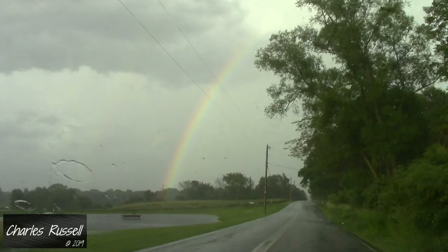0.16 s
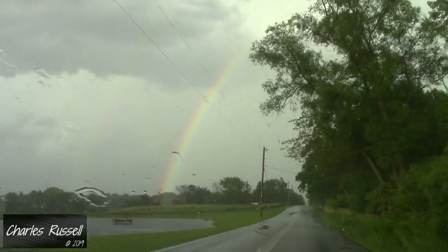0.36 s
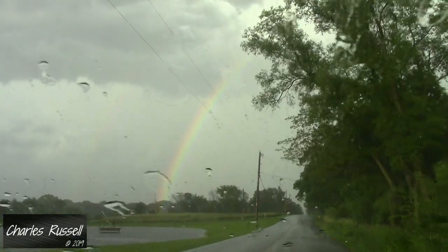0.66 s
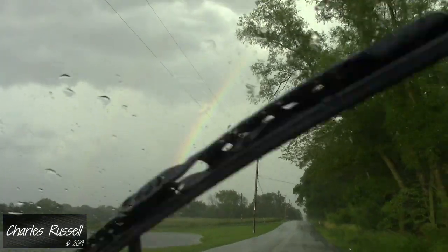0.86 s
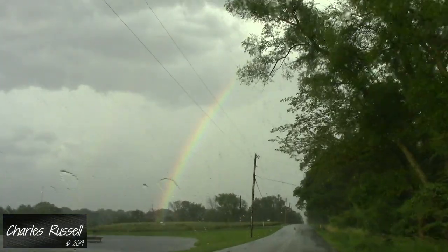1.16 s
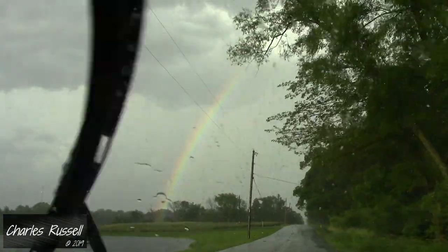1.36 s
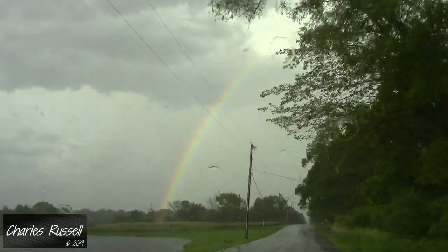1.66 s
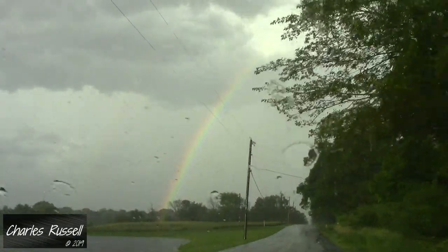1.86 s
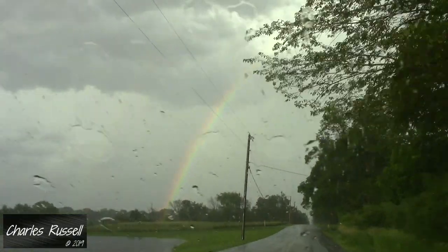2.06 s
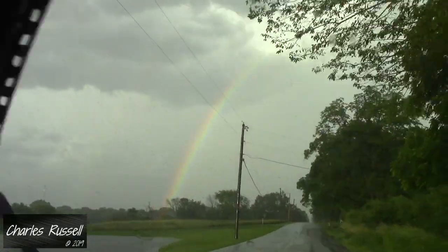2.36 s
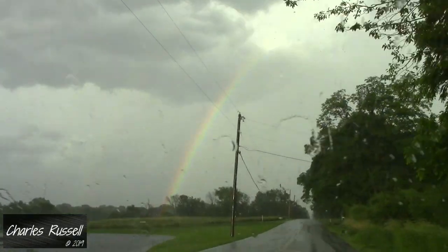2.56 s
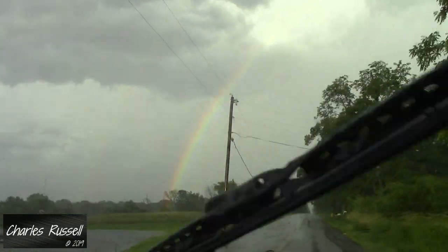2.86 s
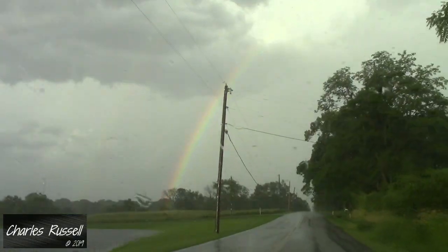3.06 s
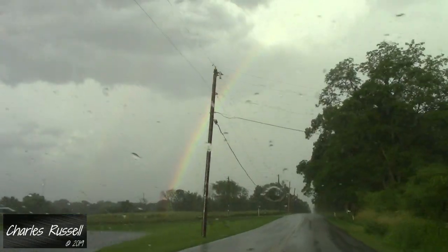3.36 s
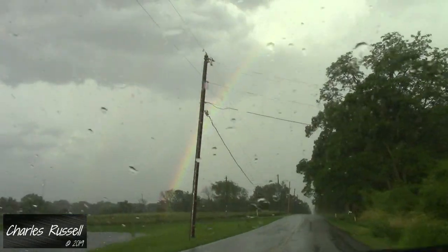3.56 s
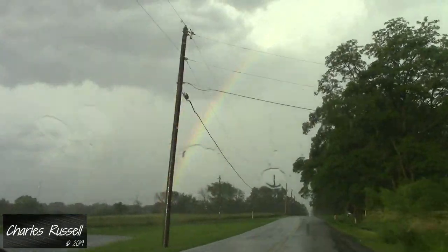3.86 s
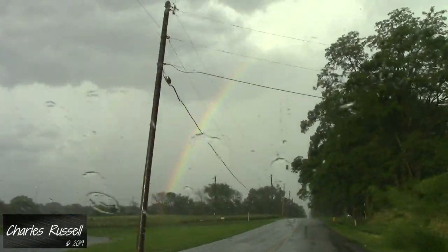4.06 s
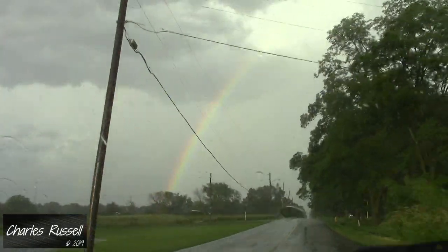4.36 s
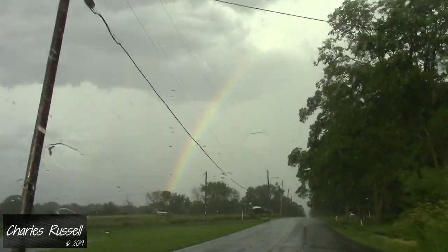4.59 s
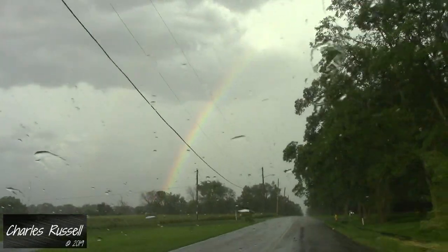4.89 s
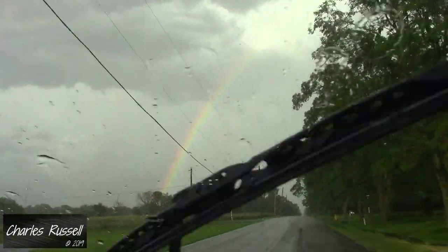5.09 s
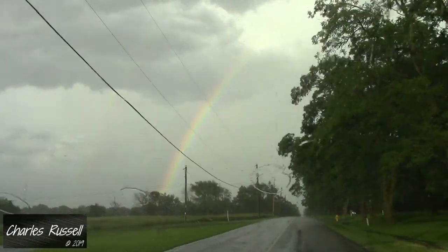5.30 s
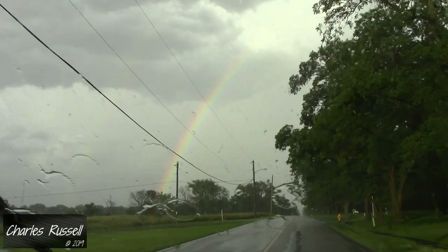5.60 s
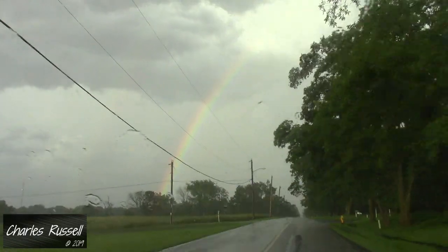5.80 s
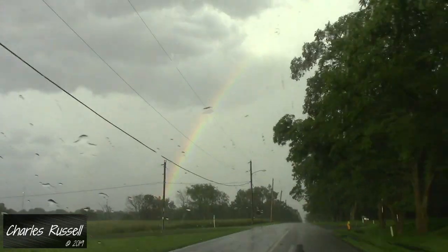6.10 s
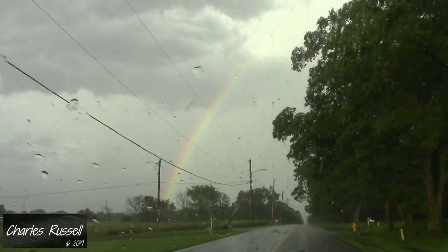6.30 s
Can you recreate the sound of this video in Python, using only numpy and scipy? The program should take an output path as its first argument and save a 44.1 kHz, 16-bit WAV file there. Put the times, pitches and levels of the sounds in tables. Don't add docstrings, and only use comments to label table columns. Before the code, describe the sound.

Heard close up inside a car moving slowly on a wet country road: low, boomy tyre and motor rumble, fine rain patter, and irregular hard ticks and hollow knocks from large drops and small hail. Wipers thump and clack about every 1.4 seconds, heavily at first, softer later. A few bumps jolt the cabin. The space is small, dry and nearly mono.

```python
import sys
import numpy as np
from scipy import signal
from scipy.io import wavfile
from scipy.ndimage import uniform_filter1d

SR = 44100
rng = np.random.default_rng(int(sys.argv[2]) if len(sys.argv) > 2 else 0)


def to_wav(sig):
    pcm = np.clip(np.atleast_2d(sig), -1, 1) * 32767
    pcm = np.round(pcm).astype(np.int16)
    wavfile.write(sys.argv[1], SR, pcm.T)


def invert_db(level):
    return 10 ** (np.asarray(level, dtype=float) / 20)


N = 284004

# [t/s, boom level/dB, f/Hz, suspension jolt 0-1]
ROAD_BUMPS = [(.51, -14, 131, .35), (1.275, 1, 128.6, .95), (1.329, -3, 132, .5), (1.454, -7, 118, 0.6),
              (1.49, 0, 145.5, .95), (1.69, -5, 145, .1), (1.79, -12, 130, 0.2), (1.86, -7, 134, .1),
              (2.001, -5, 130, .05), (3.439, -8, 143, 0), (3.781, -3, 137, 0.4), (4.015, -4.5, 125, 0.5),
              (4.085, -6, 141, .7), (5.8, -7, 141, .1), (5.835, -5, 146, .1), (5.874, -2, 129.7, 0.1),
              (6.05, -3, 150, 0.4)]
# [t/s, level/dB]
SHOWER_LEVEL = [(0.0, -27), (0.25, -28), (1.25, -29), (1.5, -28), (1.75, -28.5), (2.0, -28), (2.3, -35),
                (2.6, -29), (2.88, -37), (3.05, -35.5), (3.4, -31.5), (3.8, -33), (4.2, -28), (4.9, -33),
                (5.15, -29.5), (5.45, -32), (6.3, -29), (6.44, -30)]
# [t/s, thump/dB, clack/dB, blade knock on glass/dB]
WIPER_TURNS = [
    (.356, -1.5, -4.5, -6.5),
    (1.785, -4.5, -4, -9),
    (3.213, -9, -12.5, -18),
    (4.635, -12.5, -8, -16),
    (6.057, -14, -7.5, -14),
]
FLIP_S = 0.0125


def evened(x):
    return x / np.sqrt(np.mean(x ** 2) + 1e-20)


def read(points, hz):
    f, value = np.transpose(points)
    return np.interp(np.log(hz + 1), np.log(f + 1), value)


def colour(x, points):
    hz = np.abs(np.fft.fftfreq(8192, 1 / SR))
    log_gain = np.log(invert_db(np.maximum(read(points, hz), -100)))
    response = np.exp(np.conj(signal.hilbert(log_gain)))
    taps = np.fft.ifft(response).real[:4096]
    return signal.oaconvolve(x, taps)[:len(x)]


def add(mix, s, sound):
    part = mix[round(s * SR):][:len(sound)]
    part += sound[:len(part)]


def control(table, axis):
    rows = np.array(table)
    return np.interp(np.arange(N) / SR, rows[:, 0], rows[:, axis])


def rings(t, hz, db, t60, phase):
    decay = invert_db(db - 60 * t[:, None] / t60)
    return (decay * np.sin(2 * np.pi * (hz * t[:, None] + phase))).sum(1)


def bursts(strikes, rise_s, t60_s):
    t = np.arange(2000) / SR
    puff = np.minimum(t / rise_s, 1) * invert_db(-60 * t / t60_s)
    power = signal.oaconvolve(strikes ** 2, puff ** 2)[:N]
    return np.sqrt(abs(power)) * rng.standard_normal(N)


def road(lump_db=1.44, steady=0.3):
    # [f/Hz, level/dB]
    boom_spectrum = [(35, -20), (60, -29), (81, -16), (138, 4.5), (296, -10.5), (320, -13.5), (420, -13),
                     (700, -120)]
    drone_spectrum = [(120, -40.5), (200, -2), (278, -6), (344, 0), (417, -6), (667, -12.5), (738, -10),
                      (912, -20), (1020, -21), (1370, -27.5), (1800, -27), (2340, -34), (3960, -120)]
    heave_spectrum = [(15, -32), (30, -37), (55, 28), (80, 11), (120, -47)]
    # [t/s, level/dB]
    roughness = [(0.0, 1), (0.3, 2.5), (0.42, 3), (0.54, 3), (1.42, 2), (1.58, 6), (1.72, 6), (2.04, 5),
                 (2.12, -2.5), (3.4, 2), (3.74, -2.5), (3.98, 4.5), (4.05, 5.5), (4.44, 9.5), (4.57, -1.5),
                 (5.74, -2.5), (5.85, -0.5), (6.44, -1)]
    # [smooth-road level/dB, slope/(dB per dB of roughness), bump lift/dB]
    follow_road = [
        (-18.5, 0.86, 3),
        (-20, 0.56, 1.1),
        (-47.5, 1.5, 18),
    ]
    lag_s, rise_s, fall_s = 0.033, 0.02, 0.048

    out, t, jolt = np.zeros(N), np.arange(N) / SR, np.zeros(N)
    for s, _, _, size in ROAD_BUMPS:
        since = t - (s + lag_s)
        jolt += abs(size) * np.exp(-np.where(since < 0, -since / rise_s, since / fall_s))
    lumps = uniform_filter1d(rng.standard_normal(N), size=3000)
    lumps = evened(uniform_filter1d(lumps, size=3000))
    drive_db = control(roughness, axis=1) + lump_db * lumps
    spectra = [boom_spectrum, drone_spectrum, heave_spectrum]
    for spectrum, (level_db, slope, lift_db) in zip(spectra, follow_road):
        shake = colour(rng.standard_normal(N), spectrum)
        shake /= uniform_filter1d(shake ** 2, size=4000) ** steady + 1e-9
        out += invert_db(level_db + slope * drive_db + lift_db * np.sqrt(jolt)) * evened(shake)
    return out


def patter(per_s=650, spread_db=4.5, hiss_db=-9):
    # [f/Hz, level/dB]
    patter_spectrum = [(530, -33.5), (900, -3.5), (1030, -0.5), (1530, -6.5), (3000, -3.5), (3550, -6),
                       (4410, -12), (7580, -19.5), (10800, -29), (13400, -36), (16000, -47)]
    draw, size = rng.random(N), rng.exponential(1, N)
    strikes = invert_db(spread_db * np.minimum(size, 3.0)) * (draw < per_s / SR)
    spray = invert_db(hiss_db) * rng.standard_normal(N)
    fizz = evened(bursts(strikes, 0.0003, 0.008)) + spray
    return invert_db(control(SHOWER_LEVEL, axis=1) + 1.5) * evened(colour(fizz, patter_spectrum))


def thuds(thud_db=-5, bump_db=-4):
    # [t/s, level/dB, f/Hz]
    heavy_drops = [(0.491, -7, 328), (0.691, -10.5, 430), (0.939, -8, 261), (1.035, -1.5, 328),
                   (1.609, -2, 419), (1.644, -8, 360), (2.528, -10, 313), (2.579, -7, 340),
                   (3.235, -3, 243), (3.327, -2.5, 403), (3.859, -17, 374), (4.197, -6, 258),
                   (4.27, 0, 280), (4.4, -3.5, 334), (5.232, -6, 337), (5.842, -18, 337),
                   (6.38, -10.5, 264)]
    out, t = np.zeros(N), np.arange(12000) / SR
    for rows, trim_db, octaves, cycles in [(heavy_drops, thud_db, 0.9, 26), (ROAD_BUMPS, bump_db, 0.3, 30)]:
        for (s, db, hz, *_), c in zip(rows, rng.random((len(rows), 2, 6))):
            modes_hz = hz * 2 ** (octaves * (c[0] - 0.5))
            drum = rings(t, modes_hz, 0, cycles / hz, 0.42 * c[1])
            drum *= np.minimum(t * hz / 1.42, 1)
            add(out, s, invert_db(db + trim_db) * drum / abs(drum).max())
    return out


def wiper():
    # [f/Hz, level/dB, t60/s, delay after arm stop/FLIP_S (0: struck by the arm, above 0: by the blade)]
    wiper_modes = [
        (232, 1, 0.16, 0),
        (346, 3.5, 0.1, 0),
        (470, -1, 0.086, 0),
        (1180, -3, 0.04, 0.86),
        (1730, -5, 0.045, 1),
        (221, -4, 0.14, 1),
    ]
    out, t = np.zeros(N), np.arange(6000) / SR
    for s, thump_db, clack_db, _ in WIPER_TURNS:
        for hz, db, t60_s, blade in wiper_modes:
            near = rng.random((2, 4))
            modes_hz = hz * (0.962 + 0.085 * near[0])
            ring = rings(t, modes_hz, 0, t60_s, 0.3 * near[1])
            ring *= np.minimum(t * hz / 1.13, 1)
            hit_db = clack_db if blade else thump_db
            add(out, s + blade * FLIP_S, invert_db(hit_db + db - 3) * ring / abs(ring).max())
    return out


def strikes_all(count=130):
    # [t/s, knock/dB, panel ring centre f/Hz]
    roof_drops = [(0.0416, -20, 3800), (0.084, -14, 2440), (0.146, -15.5, 2410), (0.416, -14.5, 2560),
                  (0.626, -13.5, 2690), (0.8202, -14, 2260), (0.8622, -13, 2660), (1.1327, -17.5, 2180),
                  (1.422, -14, 2340), (1.653, -15, 2860), (2.6949, -16, 3080), (2.1372, -17.5, 3190),
                  (2.221, -16.5, 2540), (2.4982, -17, 2700), (2.562, -18, 2670), (2.6574, -9.5, 2200),
                  (2.8234, -17, 2130), (3.0773, -13.5, 2550), (3.18, -11.5, 2180), (3.029, -17, 3100),
                  (4.1216, -16, 1980), (4.2403, -18, 2630), (4.2803, -11.5, 2170), (4.3005, -15.5, 2000),
                  (4.4667, -17, 2800), (5.0382, -20, 2700), (5.2967, -16.5, 2640), (5.648, -16.5, 3070),
                  (5.738, -18, 2990), (5.981, -17, 2200)]
    # [t/s, splash/dB]
    glass_drops = [(0.044, -11.5), (.1666, -16.5), (0.6023, -21.5), (.741, -24), (1.228, -18), (1.282, -18),
                   (1.3386, -20.5), (1.7022, -20), (1.8142, -19.5), (1.917, -20.5), (1.9692, -26),
                   (2.4589, -23), (2.5399, -20.5), (2.798, -23), (3.1713, -20.5), (3.3031, -19.5),
                   (3.6035, -21.5), (3.7013, -24), (3.9857, -29), (4.2476, -22), (4.3083, -20),
                   (4.458, -19), (4.471, -20), (4.676, -22.5), (4.7432, -22.5), (5.0153, -20.5),
                   (5.738, -23), (6.043, -20.5), (6.1889, -16), (6.2978, -22)]
    # [t/s, knock/dB, ring centre f/Hz, splash/dB]
    hailstones = [(.1098, -17, 2600, -16.5), (.3115, -17.5, 2590, -23), (.3742, -28, 2600, -20),
                  (.6576, -22, 2820, -15), (.7113, -13, 2700, -13), (.7654, -15, 3050, -20),
                  (.7943, -14, 2350, -19), (.9034, -18, 2540, -18.5), (.9488, -11, 2630, -20),
                  (.9844, -6.5, 2390, -14), (1.012, -18, 2770, -18), (1.535, -12.5, 2750, -22),
                  (2.0266, -8.5, 2510, -18.5), (2.086, -15.5, 2930, -12), (2.5344, -12.5, 2750, -22),
                  (2.6827, -12.5, 2500, -17), (2.7502, -12, 2650, -22), (2.7877, -5.5, 1960, -23),
                  (2.859, -14.5, 2380, -25), (2.9603, -10.5, 2240, -19), (3.0069, -15.5, 3080, -21),
                  (3.0453, -11.5, 2140, -25), (3.1178, -9.5, 2400, -21), (4.4017, -12, 2880, -9.5),
                  (5.0572, -15, 2600, -18.5), (5.2114, -17, 2570, -19), (5.3494, -20, 2580, -18.5),
                  (5.624, -18.5, 2200, -16.5), (5.7298, -10.5, 2630, -16.5), (6.4139, -13, 2910, -12.5)]
    spread_db = 3

    c = rng.random((count, 4))
    s = (np.arange(count) + c[:, 0]) / count * (N / SR - 0.01)
    shower_db = np.interp(s, *np.transpose(SHOWER_LEVEL))
    knock_db = shower_db + 0.5 + spread_db * c[:, 1]
    splash_db = shower_db + 2.5 + spread_db * (c[:, 3] - 0.5)
    small = np.transpose([s, knock_db, 2600 * (0.8 + 0.397 * c[:, 2]), splash_db])
    roof = [(s, db, hz, db - 14.5) for s, db, hz in roof_drops]
    glass = [(s, db - 2, 2750, db) for s, db in glass_drops]
    blade = [(s + FLIP_S, db, 1930, db - 18) for s, _, _, db in WIPER_TURNS]
    return np.vstack([hailstones, roof, glass, blade, small])


def ticks(rows, tick_db=1, crack_db=9, splash_t60_s=0.008):
    # [f/Hz, level/dB]
    tick_spectrum = [(2000, -53), (4000, -7.5), (6000, -0.5), (10000, -9.5), (13000, -16), (16500, -32)]
    strikes = np.zeros(N)
    for s, _, _, db in rows:
        add(strikes, s + 0.00054, invert_db(np.array([db + tick_db])))
    gain = np.linalg.norm(colour(np.eye(1, 4096)[0], tick_spectrum))
    splash = bursts(strikes, 0.0004, splash_t60_s)
    return colour(splash + invert_db(crack_db) * strikes, tick_spectrum) / gain


def drops(rows, knock_db=4, scatter=0.31):
    out, t = np.zeros(N), np.arange(1600)[:, None] / SR
    for (s, db, hz, _), c in zip(rows, rng.random((len(rows), 2, 40))):
        octaves = 3.4 * ((np.arange(40) + c[0]) / 40 - 0.65)
        modes_hz = hz * 2 ** octaves
        late_s = np.maximum(t - 0.000815 * 2 ** (-0.8 * octaves), 0)
        t60_s = 0.027 * 2 ** (-0.3 * octaves)
        hump_db = -np.where(octaves > 0, 7.5, 2.8) * octaves ** 2
        ring = invert_db(hump_db - 60 * late_s / t60_s) * np.minimum(late_s * modes_hz, 1)
        knock = (ring * np.sin(2 * np.pi * (modes_hz * late_s + scatter * c[1]))).sum(1)
        add(out, s - 0.0008, invert_db(db + knock_db) * knock / abs(knock).max())
    return out


def cabin(x):
    # [f/Hz, t60/s]
    cabin_t60 = [(500, 0.18), (1500, 0.031), (4000, 0.047), (10000, 0.062)]
    out, turn = np.zeros(N), 2 * np.pi * 9.0 * np.arange(N) / SR
    for k in range(3):
        taps = np.zeros(8000)
        places = np.arange(60, 7980, 20) + rng.integers(0, 20, 396)
        taps[places] = rng.choice([-1., 1.], 396)
        hz, t, z = signal.stft(taps, SR, nperseg=128)
        decay = invert_db(-60 * t / read(cabin_t60, hz)[:, None])
        tail = signal.istft(z * decay, SR, nperseg=128)[1]
        share = np.sqrt(2 / 3) * np.cos(turn + k * np.pi * 2 / 3)
        out += signal.oaconvolve(x * share, tail / np.linalg.norm(tail))[:N]
    return out


def scene():
    # [f/Hz, side over mid/dB]
    side_spectrum = [(30, -43), (100, -42), (200, -33), (400, -24), (950, -22), (2400, -17), (6000, -12),
                     (15000, -15.5)]
    rows = strikes_all()
    hits = drops(rows) + ticks(rows) + thuds() + wiper() + patter()
    mid = hits + invert_db(-6.5) * cabin(hits) + road()
    place = evened(uniform_filter1d(rng.standard_normal(N), size=400))
    apart = invert_db(5) * cabin(hits) + invert_db(4.0) * place * hits + road()
    side = invert_db(-6.5) * colour(apart, side_spectrum)
    lean = invert_db(-23) * colour(hits, [(500, -16), (3000, -6), (16000, -4)])
    return np.array([mid + side - lean, mid - side + lean])


def low_pass(x):
    return signal.sosfilt(signal.butter(12, 16260, fs=SR, output="sos"), x)


def record(dry):
    bass_cut = signal.butter(2, 32, "high", fs=SR, output="sos")
    cut = signal.sosfilt(bass_cut, dry)
    soft = np.tanh(cut * 0.91) / 0.98
    edge = signal.firwin(255, 16200, window=("kaiser", 5), fs=SR)[None]
    return low_pass(signal.oaconvolve(soft, edge, "same"))


dry = scene()
out = record(dry)
to_wav(out)
```